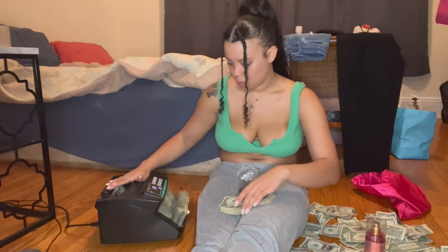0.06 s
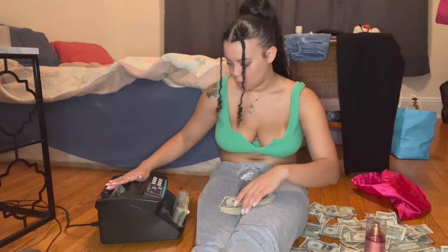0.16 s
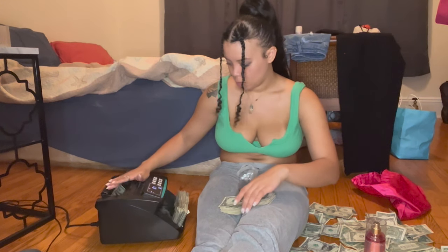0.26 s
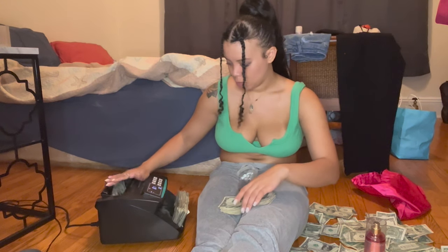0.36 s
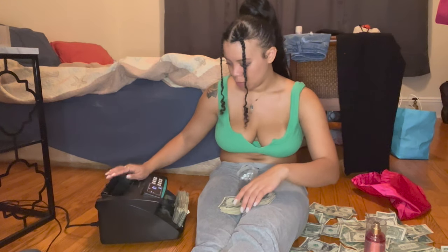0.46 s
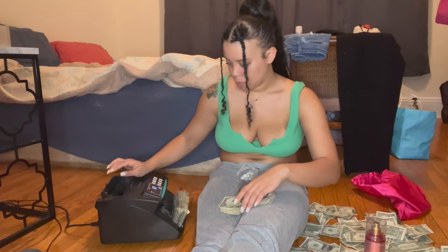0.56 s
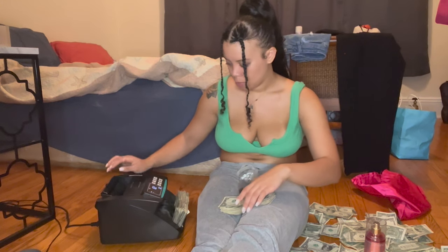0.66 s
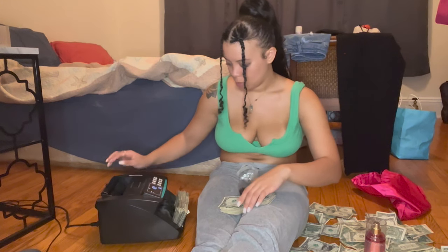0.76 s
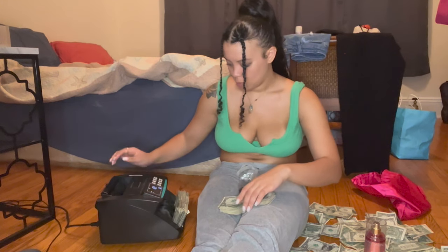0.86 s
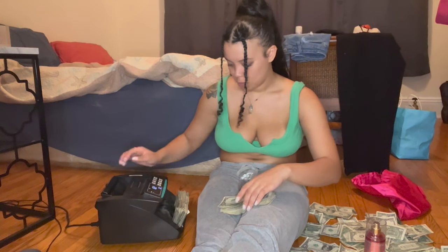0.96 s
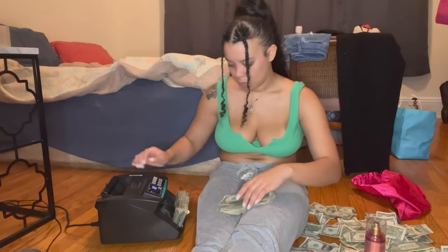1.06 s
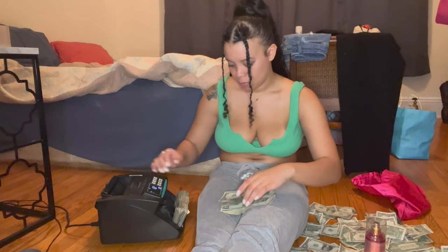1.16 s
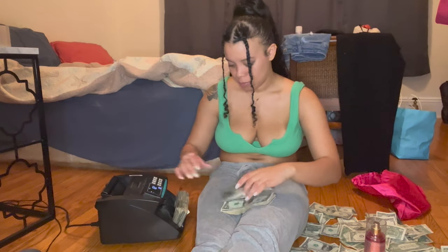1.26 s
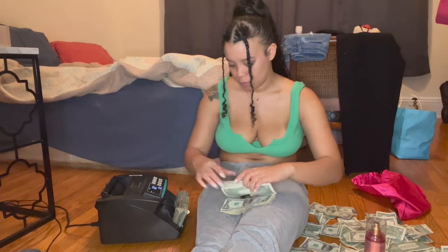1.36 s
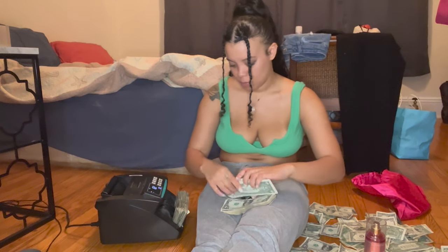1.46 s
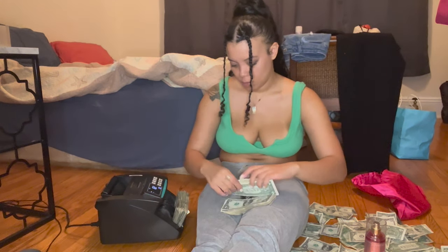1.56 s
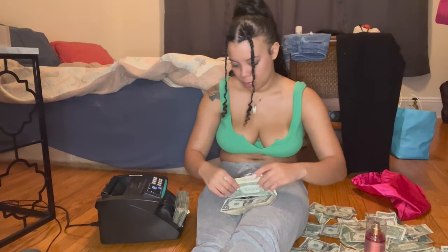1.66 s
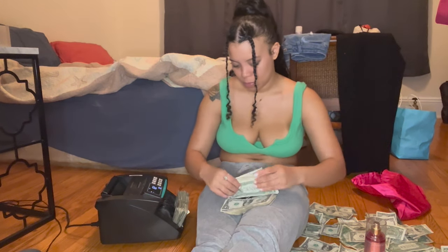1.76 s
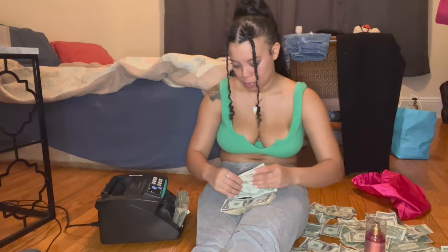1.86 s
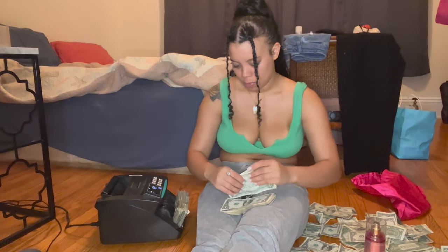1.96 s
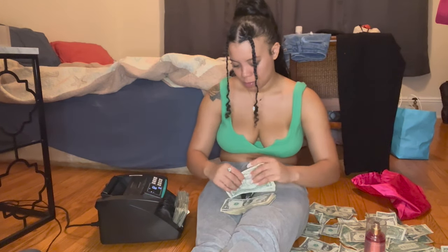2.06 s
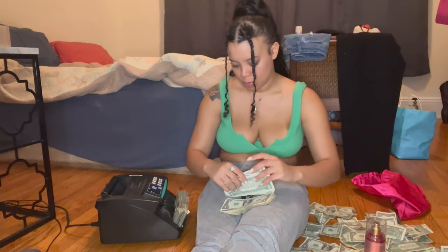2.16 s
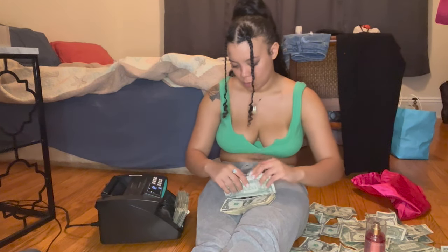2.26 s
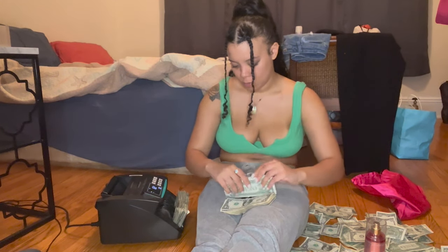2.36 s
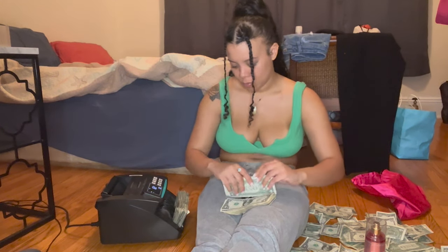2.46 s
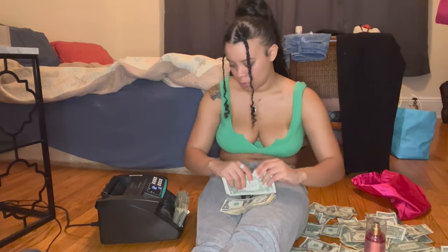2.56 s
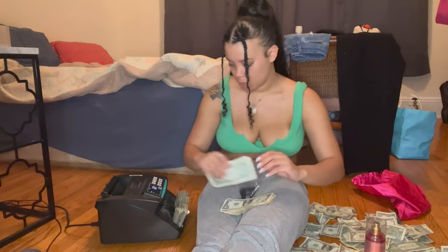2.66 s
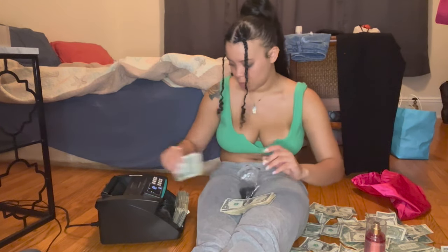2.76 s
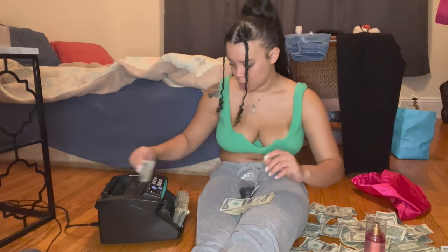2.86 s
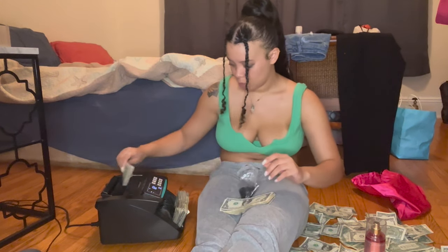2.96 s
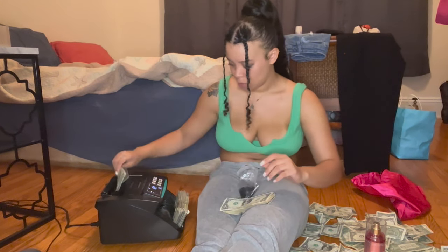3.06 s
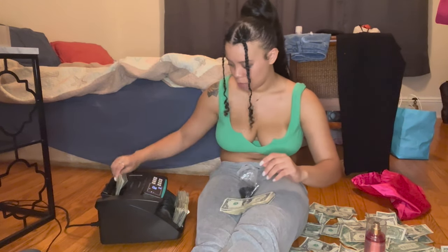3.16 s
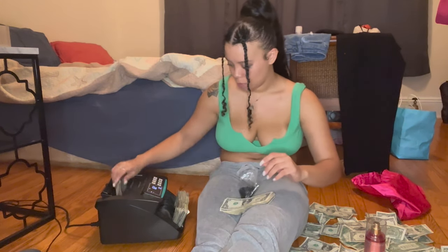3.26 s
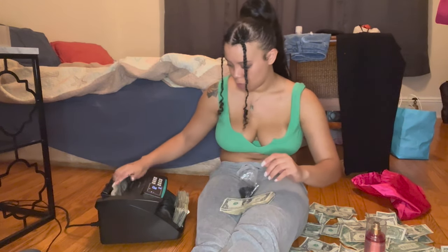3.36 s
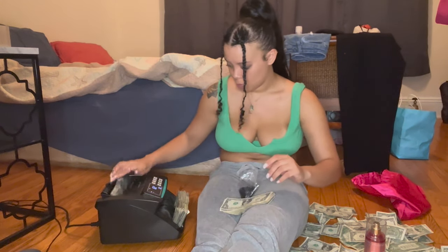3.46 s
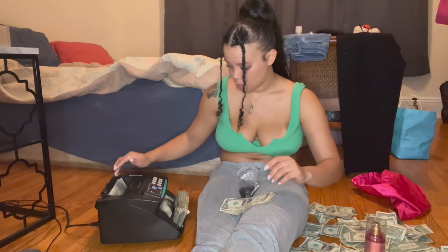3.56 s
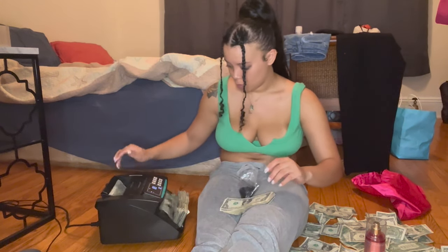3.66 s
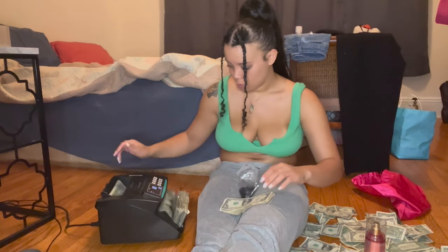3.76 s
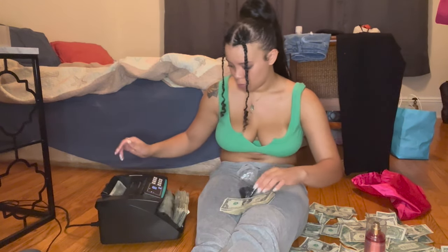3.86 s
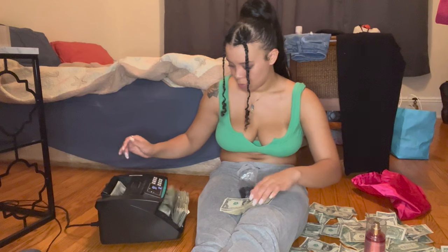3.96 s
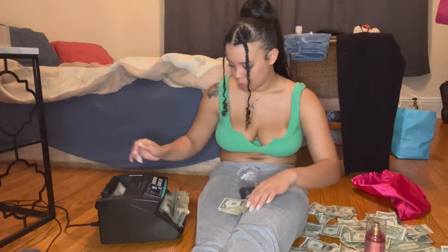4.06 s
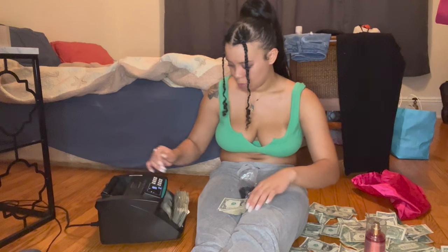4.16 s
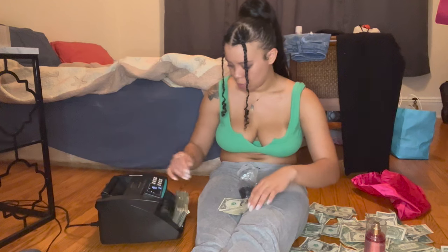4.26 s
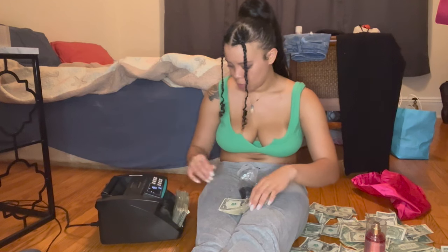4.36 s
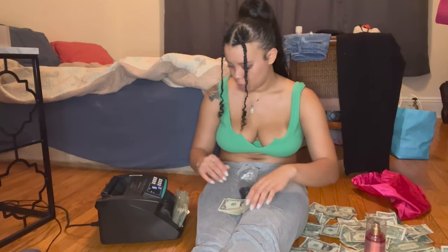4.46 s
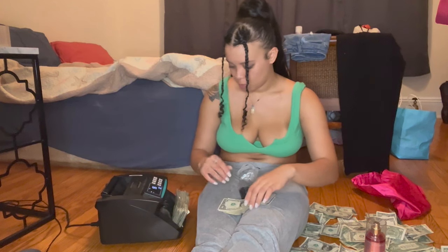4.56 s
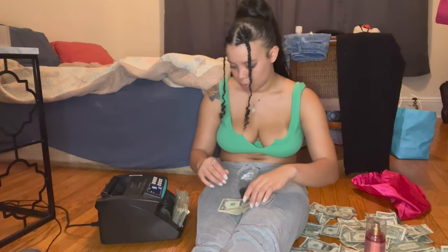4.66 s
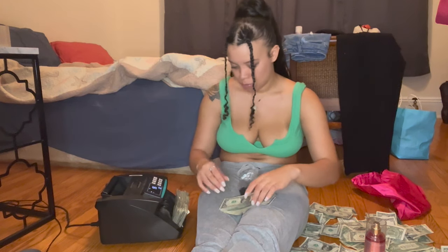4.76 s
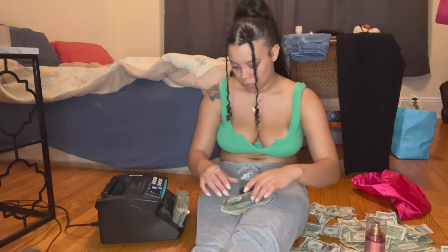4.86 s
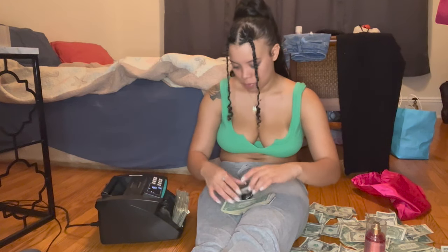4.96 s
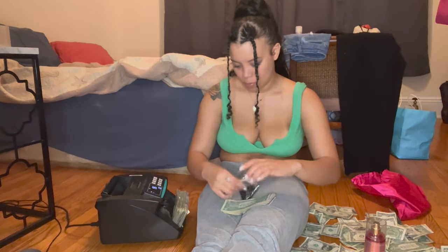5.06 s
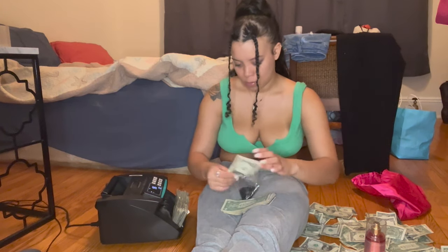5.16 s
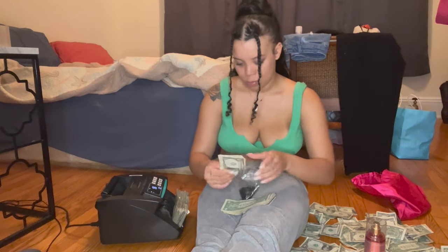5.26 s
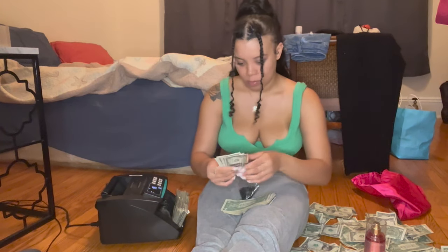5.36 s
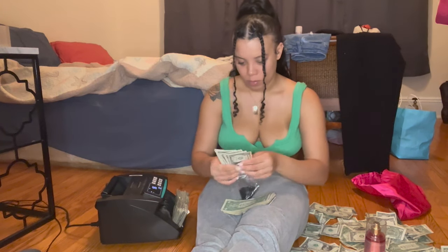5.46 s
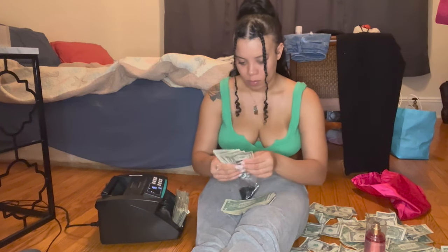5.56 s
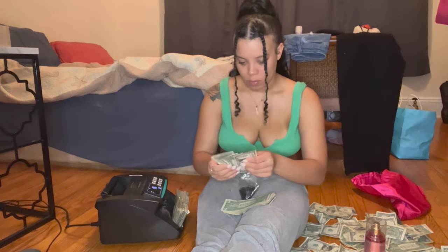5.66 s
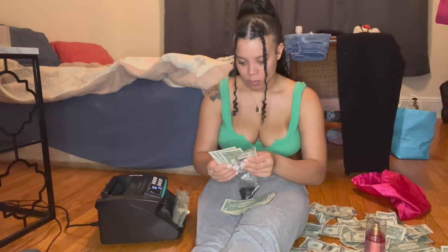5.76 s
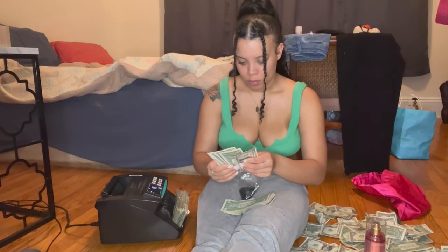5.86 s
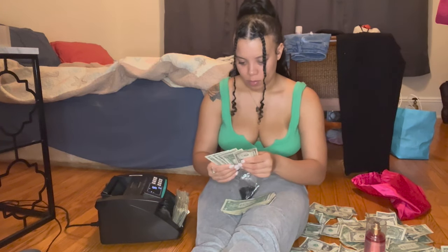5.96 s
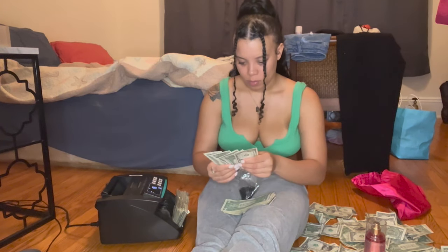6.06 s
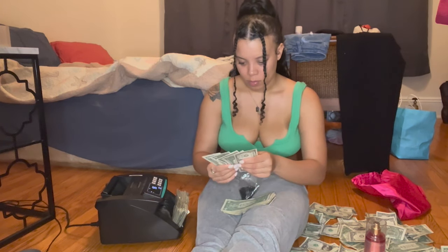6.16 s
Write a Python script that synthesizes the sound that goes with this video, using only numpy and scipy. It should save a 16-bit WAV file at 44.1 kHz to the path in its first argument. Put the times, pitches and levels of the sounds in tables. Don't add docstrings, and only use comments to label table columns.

```python
import sys
import numpy as np
from scipy import signal
from scipy.fft import rfft, irfft, next_fast_len
from scipy.io import wavfile
from scipy.ndimage import uniform_filter1d

SR = 44100
rng = np.random.default_rng(int(sys.argv[2]) if len(sys.argv) > 2 else 0)


def ratio(d):
    e = np.asarray(d, float) / 20
    return 10 ** e


def wav_record(signal):
    frames = np.transpose(np.atleast_2d(signal))
    bounded = np.clip(frames, -1, 1)
    quanta = np.round(bounded * 32767).astype(np.int16)
    wavfile.write(sys.argv[1], SR, quanta)


N = 274302
CLOCK = np.arange(0, N + 32, 32) / SR


def evened(x):
    return x / np.sqrt(np.mean(x ** 2) + 1e-20)


def noise_at_ports():
    return rng.standard_normal((2, N))


def slow_noise(samples):
    return evened(uniform_filter1d(rng.standard_normal(N), samples))


def read(points, hz):
    f, value = np.transpose(points)
    return np.interp(np.log(hz + 1), np.log(f + 1), value)


def coloured(x, points, keep_hz=np.inf):
    ripple_db, ripple_bins = 2.0, 10
    hz = abs(np.fft.fftfreq(8192, 1 / SR))
    ripple = evened(uniform_filter1d(rng.standard_normal(len(hz)), ripple_bins))
    ripple = np.interp(hz, np.arange(len(hz)) * hz[1], ripple) * (hz > 500)
    gain_db = read(points, np.minimum(hz, keep_hz)) + ripple_db * ripple
    log_gain = np.log(ratio(np.maximum(gain_db, -100)))
    taps = np.fft.ifft(np.exp(np.conj(signal.hilbert(log_gain)))).real[:4096]
    return signal.oaconvolve(x, taps[None], axes=1)[:, :N]


def resonate(x, hz, width):
    return evened(signal.lfilter(*signal.iirpeak(hz, hz / width, SR), x))


def resonate_twice(x, hz, width):
    return resonate(resonate(x, hz, width), hz, width)


def glide(x, hz, width):
    turn = np.exp(2j * np.pi * np.cumsum(hz) / SR)
    r = np.exp(-np.pi * width / SR)
    smooth = signal.lfilter([1], np.convolve([1, -r], [1, -r]), x / turn + 1e-18)
    return (turn * smooth).real


def grains(per_s, spread_db):
    size = ratio(spread_db * np.minimum(rng.exponential(1, (2, N)), 5))
    return size * rng.choice([-1., 1.], (2, N)) * (rng.random((2, N)) < per_s / SR)


def patchy(x, patchy_db, frames, bins):
    z = signal.stft(x, nperseg=256, noverlap=192)[2]
    field = uniform_filter1d(rng.standard_normal(z.shape[1:]), bins, 0)
    field = evened(uniform_filter1d(field, frames, 1))
    return signal.istft(z * ratio(patchy_db * field), nperseg=256, noverlap=192)[1][:, :N]


def shared(x, share):
    return np.array([x[0], share * np.roll(x[0], 4) + np.sqrt(1 - share ** 2) * x[1]])


def wobbly(hz, wander_hz, smooth_s):
    drift = evened(uniform_filter1d(noise_at_ports(), int(smooth_s * SR), axis=1))
    pitch = hz + wander_hz * (drift[0] + 0.22 * drift)
    return np.sqrt(2) * np.sin(2 * np.pi * np.cumsum(pitch, axis=1) / SR)


def swell(full_s, end_s, db, rise_s, fade_s):
    full_s, end_s, db, rise_s, fade_s = (np.reshape(v, (-1, 1)) for v in (full_s, end_s, db, rise_s, fade_s))
    late = np.maximum((full_s - CLOCK) / (abs(rise_s) + 1e-4), (CLOCK - end_s) / fade_s)
    return np.maximum(db - 30 * np.maximum(late, 0), -140)


def per_sample(control):
    return np.interp(np.arange(N) / SR, CLOCK, control)


def joined(*levels_db):
    return per_sample(np.sqrt(sum((ratio(db) ** 2).sum(0) for db in levels_db)))


# frequency in Hz, level in dB per Hz.
MURMUR = [(90, -10), (170, -7), (258, -7.5), (400, -16.5), (730, -24), (1000, -26.5), (3000, -35.5),
          (7100, -42), (10500, -35), (12500, -40.5), (14200, -32), (14500, -91.5)]
# frequency in Hz, level in dB per Hz.
RUMBLE_SHAPE = [(27, -58.5), (39, -9.5), (50, 3.5), (64, 4), (85, -6.5), (125, -8), (180, -53.5)]
# peak in
# seconds, level in dB.
SWELLS = [(.07, -53), (.62, -59.5), (.87, -58), (1.4, -68), (1.65, -63.5), (1.9, -64.5), (2.07, -66),
          (2.23, -65.5), (2.55, -63.5), (2.89, -63.5), (3.25, -71.5), (3.5, -58.5), (3.85, -57.5),
          (4.27, -55), (4.501, -58), (4.72, -59), (5.05, -63), (5.26, -60.5), (5.58, -62), (5.9, -65.5),
          (6.099, -66.5)]
# frequency in Hz, level in dB.
WHINE = [(10637, -104)]


def quiet_bedroom():
    murmur_db, rumble_db, rise_s, fade_s = -71.5, -71, 0.46, 0.33
    murmur = evened(coloured(noise_at_ports(), MURMUR))
    rumble = coloured(noise_at_ports(), RUMBLE_SHAPE)
    rumble = rumble[0] + 0.64 * rumble
    rumble /= np.sqrt(uniform_filter1d(rumble.mean(0) ** 2, 12000) + 1e-12)
    s, swell_db = np.transpose(SWELLS)
    traffic = np.hypot(ratio(rumble_db), joined(swell(s, s, swell_db, rise_s, fade_s)))
    whine = sum(ratio(db - 9.5) * np.sin(2 * np.pi * hz * np.arange(N) / SR) for hz, db in WHINE)
    return ratio(murmur_db) * murmur + traffic * rumble + whine


# frequency in Hz, t60 in seconds.
ROOM = [(300, 0.46), (1000, 0.25), (3000, 0.12), (9000, 0.24)]


def room(x):
    taps = rng.choice([-1., 1.], (2, SR // 3)) * (rng.random((2, SR // 3)) < .06)
    hz, t, z = signal.stft(taps, SR, nperseg=256)
    tail = signal.istft(z * ratio(-60 * t / read(ROOM, hz)[:, None]), SR, nperseg=256)[1]
    return signal.fftconvolve(x, tail / np.linalg.norm(tail[0]), axes=1)[:, :N]


# peak in seconds, rise in seconds, rustle in dB,
# hollow flex over the rustle in dB, flex pitch in Hz.
HANDS = [(1.382, 0.075, -67.5, -2.5, 1090), (1.473, 0.0025, -68.5, 4, 940), (1.559, 0.35, -73, -8, 982),
         (1.635, 0.14, -82.5, 4, 1005), (1.763, 0.0059, -65.5, -1, 1015), (1.822, 0.074, -61.5, 0.5, 1074),
         (1.898, 0.19, -66.5, 3, 1150), (1.965, 0.03, -63, 0.5, 1036), (2.102, 0.68, -76, -8, 1120),
         (2.285, 0.1, -78.5, -10.5, 1009), (2.53, 0.11, -85.5, -2, 1098), (2.608, .05, -79, 7.5, 1300),
         (2.632, 0.088, -70, -11, 1270), (2.67, 0.12, -79, -20, 1130), (3.268, 0.0017, -54.5, -4, 1697),
         (3.3, 0.055, -59, -6.5, 784), (3.37, 0.18, -72, -11.5, 805), (3.44, 0.19, -71.5, -11, 2020),
         (3.481, .004, -61, -14, 2000)]
FANNING = [(5.035, 0.0023, -66.5, 1, 1110), (5.114, 0.08, -59, 0, 1274), (5.123, 0.0082, -51.5, 4.5, 1702),
           (5.21, 0.206, -67.5, 0.5, 1670), (5.33, 0.12, -77, -19, 1190), (5.413, .003, -70, 5, 1874),
           (5.449, 0.063, -61.5, 0, 1900), (5.475, .04, -77, 12, 716), (5.51, .05, -81.5, 7.5, 695),
           (5.565, 0.07, -69.5, -8, 1930), (5.651, 0.2, -66.5, 3.5, 1900), (5.86, 0.24, -76, 4, 1080),
           (5.896, 0.067, -76.5, 7.5, 1830), (5.72, .1, -87, 6.5, 1400), (5.93, 0.18, -74, 5, 1882),
           (6, 0.0033, -69.5, 4, 1288), (6.032, 0.078, -71.5, 12, 994)]
# frequency in Hz, level in dB per Hz.
RUSTLE = [(940, -39.5), (1600, -6), (2390, 3), (2670, 0), (3030, 3), (4850, -0.5), (5900, 1), (6490, -3.5),
          (9200, -1.5), (12300, -8), (16000, -40), (22000, -120)]
# frequency in Hz, level in dB per Hz.
FLEX = [(180, -38), (300, 2.5), (412, -8.5), (541, -59.5), (610, -5.5), (709, -7), (895, 8.5), (1720, -16),
        (2370, -17.5), (2800, -12.5), (3640, -30), (6160, -120)]
# peak in seconds, level in dB.
BUMPS = [(1.508, -72), (1.658, -74), (1.822, -61.5), (1.98, -65), (2.18, -70.5), (2.4, -73), (2.644, -71),
         (3.0, -73.5), (3.296, -53.5), (3.38, -62.5), (3.53, -50), (3.6, -48.5), (.83, -66), (1.03, -70.5),
         (4.46, -59), (4.67, -68), (5.0, -63.5), (5.116, -62.5), (5.451, -60), (5.78, -66.5), (5.86, -62),
         (5.93, -66), (6.19, -70)]


def hands():
    rustle_fade_s, flex_fade_s, bump_rise_s, bump_fade_s = 0.12, 0.11, 0.065, 0.22
    s, rise_s, rustle_db, flex_db, pitch_hz = np.transpose(HANDS + FANNING)
    slides_db = swell(s, s, rustle_db, rise_s, rustle_fade_s)
    power = ratio(slides_db + flex_db[:, None]) ** 2
    flex_hz = per_sample(pitch_hz @ power / power.sum(0))

    slips = ratio(3.8 * slow_noise(300)) * grains(per_s=4000, spread_db=0.5)
    slips = patchy(slips + 1.9 * room(slips), patchy_db=2.0, frames=28, bins=6)
    rustle = ratio(5.5) * joined(slides_db) * evened(coloured(slips, RUSTLE, 11500))
    hollow = evened(glide(slips, np.maximum(flex_hz, 500), 750))
    flex = .4 * evened(coloured(slips, FLEX)) + .9 * hollow
    flexing = ratio(3.0) * joined(swell(s, s, rustle_db + flex_db, rise_s, flex_fade_s))

    bump_s, bump_db = np.transpose(BUMPS)
    landing = joined(swell(bump_s, bump_s, bump_db, bump_rise_s, bump_fade_s))
    bumps = landing * resonate_twice(noise_at_ports(), 162, 230)
    return rustle + flexing * flex + bumps


# start in seconds, peak in dB, low share in dB, ring in Hz, crack in Hz.
SNAPS = [(1.3467, -70, -6, 1000, 2900), (1.3622, -60.5, -13, 1000, 3080), (1.3748, -55.5, 2, 970, 3100),
         (1.4009, -62, 15.5, 1010, 3000), (1.4709, -53, -4, 930, 3970), (1.4827, -66, 13, 1260, 3020),
         (1.5737, -77, 19, 890, 4620), (1.7635, -56, -5, 1180, 3390), (1.7745, -50.5, -3, 1110, 3470),
         (1.7795, -55.5, -1, 1000, 3330), (1.801, -64.5, 7, 1100, 2380), (1.8135, -46, -19, 1110, 5870),
         (1.8158, -40, -3, 900, 5860), (1.8235, -53.5, -10, 1100, 4000), (1.8765, -56, 4, 1140, 2500),
         (1.9605, -54.5, -3, 1100, 2430), (1.969, -55, -6, 1100, 5830), (2.605, -76, 12, 1290, 3120),
         (3.2057, -75, 3, 1510, 2840), (3.2685, -46, -5, 2020, 3530), (3.2868, -40, -16, 824, 4670),
         (3.4788, -43.5, -12.5, 1520, 2480), (5.0335, -55, -5, 1640, 3820), (5.0885, -55, -7, 2080, 2110),
         (5.0945, -57, 7, 990, 4800), (5.1115, -49, -6, 1700, 4980), (5.1198, -31.5, -7, 1660, 5090),
         (5.1222, -34.5, -12, 2400, 4600), (5.1255, -37.5, -1, 1720, 4450), (5.856, -71, 16, 510, 1500),
         (5.4129, -63.5, -7, 1580, 5200), (5.4358, -52.5, -13, 1600, 3380),
         (5.4496, -54.5, -12, 1860, 3200), (5.5456, -62, -13, 1500, 5710), (5.5645, -60, -14, 867, 8950),
         (5.9992, -53, 8.5, 1610, 2900), (6.0035, -54, 0.5, 2440, 4230), (6.0262, -55.5, 9, 1026, 2650)]


def snaps():
    ports, t = np.zeros((2, N)), np.arange(1200) / SR

    def pop(width_s):
        return np.e * t / width_s * np.exp(-t / width_s)

    fizz = rng.standard_normal((len(SNAPS), 2, len(t)))
    for (s, db, low_db, ring_hz, crack_hz), tear in zip(SNAPS, fizz):
        crack = 0.45 * (tear[0] + .6 * tear) * pop(0.00047)
        crack = crack + 0.36 * np.sin(2 * np.pi * crack_hz * t) * pop(0.001)
        ring = ratio(low_db) * np.sin(2 * np.pi * ring_hz * t) * pop(0.00065)
        ports[:, round(s * SR):][:, :len(t)] += ratio(db) * (crack + ring)
    ports = signal.lfilter(*signal.butter(1, [500, 12000], "band", fs=SR), ports)
    return ports + ratio(-9.0) * room(ports)


# frequency in Hz, level in dB, t60 in seconds.
HOPPER = [(786, -62.5, 0.39), (1900, -56.5, 0.091), (2360, -57, 0.055), (3340, -50.5, 0.045)]


def hopper():
    landing_s = 3.2675
    t = np.maximum(np.arange(N) / SR - landing_s, 0)
    return sum(ratio(db - np.minimum(60 * t / t60, 200)) * np.sin(2 * np.pi * hz * t) for hz, db, t60 in HOPPER)


SPIN_UP_S, GEARS_STOP_LEAD_S, COAST_S = 0.024, 0.13, 0.3
# at full speed in seconds, switched off in seconds.
RUNS = [
    (-.2, 0.7),
    (3.56, 4.353),
]
# full in seconds, end in seconds, whirr in dB,
# rise in seconds, speed from 0 to 1, whine in dB.
CREEP = (3.36, 3.5, -75, .1, 1.0, -63.5)
# frequency in Hz, level in dB per Hz.
WHIRR = [(120, -21.5), (200, 12), (480, -8.5), (800, -9), (1150, -5), (1500, -8), (2700, -14),
         (3400, -12.5), (4500, -14.5), (7000, -20.5), (9200, -10), (11000, -19), (13300, -9), (15500, -13)]
# frequency in Hz, width in Hz, level in dB.
BELT = [(785, 190, -6.5), (2100, 800, -7), (1570, 350, -16.5), (2480, 400, -15.5), (2030, 300, -14)]


def idle():
    idle_db, whine_db, coast_lag_s, coast_fade_s = -59.5, -66, 0.11, 0.29
    slowing = 0.45
    on, off = np.transpose(RUNS)
    full_s, end_s, creep_db, rise_s, creep_speed, creep_whine_db = CREEP
    whirring = joined(swell(on, off + coast_lag_s, idle_db, SPIN_UP_S, coast_fade_s),
                      swell(full_s, end_s, creep_db, rise_s, SPIN_UP_S))
    whining = joined(swell(on, off, whine_db, SPIN_UP_S, coast_fade_s),
                     swell(off + 0.085, off + coast_lag_s, -63, 0.15, 0.16),
                     swell(full_s, end_s, creep_whine_db, rise_s, SPIN_UP_S))
    coasting_s = np.where(CLOCK < on[1], CLOCK - off[0], CLOCK - off[1]).clip(0)
    creeping = (CLOCK > full_s - rise_s) & (CLOCK < on[1])
    speed = per_sample(np.where(creeping, creep_speed, .98 - slowing * coasting_s)).clip(.5, 1.2)
    teeth = grains(per_s=12000, spread_db=5.5)
    whine = sum(ratio(db) * evened(glide(np.sign(teeth), hz * speed, w)) for hz, w, db in BELT)
    whirr = patchy(evened(coloured(teeth, WHIRR)), patchy_db=3.0, frames=32, bins=3)
    return whirring * whirr + whining * evened(whine)


def rings(hits, gain_db, rise_s, t60, damping):
    out, t = np.zeros((2, N)), np.arange(6000) / SR
    for (s, db, hz), (detune, turn, twin) in zip(hits, rng.uniform(-1, 1, (len(hits), 3))):
        part = out[:, round(s * SR):][:, :len(t)]
        turns = hz * t + np.array([[-.1], [.1]]) * turn
        twin_turns = turns * (1 + 0.17 * detune) + twin
        pair = np.sin(2 * np.pi * turns) + 0.51 * np.sin(2 * np.pi * twin_turns)
        fall_db = 60 * t / t60 * (hz / 800) ** damping
        part += ratio(db + gain_db - fall_db) * (1 - np.exp(-t / rise_s)) * pair
    return out


# start in seconds, peak in dB, ring in Hz.
THUMPS = [(0.024, -30.5, 346), (0.504, -31, 368), (3.584, -24, 337), (3.644, -32, 378), (3.715, -27.5, 330),
          (3.775, -22, 399), (3.809, -37.5, 448), (3.861, -25, 410), (3.955, -24, 376), (4.039, -27, 347),
          (4.082, -33.5, 333)]
# start in seconds, peak in dB, ring in Hz.
KNOCKS = [(.023, -31, 773), (.054, -35.5, 842), (.064, -36, 1330), (.4185, -38.5, 4300), (.433, -46, 2150),
          (.452, -45.5, 1620), (.464, -30.5, 1480), (.471, -32.5, 1300), (.481, -53.5, 560),
          (.494, -32.5, 1900), (.505, -27, 797), (.522, -38, 900), (3.49, -52.5, 2090), (3.511, -44, 990),
          (3.542, -35.5, 820), (3.555, -29.5, 1135), (3.582, -38.5, 640), (3.598, -26, 1370),
          (3.629, -28, 935), (3.632, -29.5, 1420), (3.6, -36.5, 806), (3.654, -34.5, 830),
          (3.681, -39, 855), (3.7, -36, 805), (3.731, -29, 907), (3.72, -35, 900), (3.744, -34, 670),
          (3.773, -32, 634), (3.785, -32.5, 890), (3.827, -28, 711), (3.806, -27, 917), (3.81, -27, 2000),
          (3.85, -32, 744), (3.851, -34, 1460), (3.899, -34.5, 750), (3.922, -41.5, 980), (3.957, -34, 729),
          (3.966, -36, 2100), (3.985, -37.5, 610), (4.006, -36, 985), (4.041, -38.5, 850),
          (4.057, -33.5, 930), (4.031, -30, 810), (4.074, -34.5, 980), (4.095, -26, 1530),
          (4.148, -31, 963), (4.13, -29.5, 1290), (4.165, -38.5, 990), (4.22, -49, 1090)]


def thumps():
    boards = rings(THUMPS, gain_db=-2.5, rise_s=.003, t60=0.12, damping=0)
    panels = rings(KNOCKS, gain_db=2.7, rise_s=.0012, t60=.034, damping=.5)
    return boards + panels


# start in seconds, end in seconds, level in dB, rattle over it in dB.
FEED = [
    (-.1, 0.069, -47, 6.5),
    (0.437, 0.502, -45, 1),
    (3.505, 4.146, -42.5, 1.5),
]
# frequency in Hz, width in Hz, level in dB.
BOOM = [(338.5, 66, 3.5), (377, 4.1, -7.5), (421.3, 26, -4), (193, 62, -2.5)]
# full in seconds, end in seconds, level in dB.
SURGES = [(0.01, 0.05, -39), (0.082, 0.148, -38.5), (0.23, 0.325, -41), (0.36, 0.402, -41),
          (0.405, 0.448, -39), (0.467, 0.557, -42.5), (0.597, 0.663, -39), (0.716, 0.755, -41.5),
          (0.78, 0.8, -58), (0.827, 0.885, -67.5), (3.52, 3.534, -43), (3.542, 3.582, -39.5),
          (3.595, 3.627, -33), (3.682, 3.71, -46), (3.764, 3.777, -38), (3.816, 3.84, -38),
          (3.895, 3.915, -32.5), (3.94, 3.955, -34.5), (4.004, 4.078, -38.5), (4.09, 4.188, -39.5),
          (4.236, 4.257, -41), (4.31, 4.349, -42.5), (4.401, 4.413, -42.5), (4.49, 4.53, -76)]


def motor():
    hum_db, hum_fade_s, throb_db, throb_fade_s = -47.5, 0.089, -49.5, 0.026
    on, off = np.transpose(RUNS)
    start, end, feed_db, rattle_db = np.transpose(FEED)
    hum = joined(swell(on, off, hum_db, SPIN_UP_S, hum_fade_s)) * wobbly(119.8, 0.81, 0.07)
    brake_s = off - 0.061
    throbbing = joined(swell(on, off, throb_db, SPIN_UP_S, throb_fade_s),
                       swell(brake_s, brake_s + .04, -38.5, 0.05, throb_fade_s))
    throb = throbbing * wobbly(95.5, 2.2, 0.058)

    load = joined(swell(on, off - GEARS_STOP_LEAD_S, -49.5, SPIN_UP_S, COAST_S),
                  swell(start + 0.01, end, feed_db + rattle_db - 2, .04, 1))
    load = load * joined(swell(on - .2, off, 0, SPIN_UP_S, 0.17))
    chatter = ratio(2.0 * slow_noise(900)) * noise_at_ports()
    boom = sum(ratio(db) * resonate_twice(chatter, hz, w) for hz, w, db in BOOM)
    gears = evened(boom) + ratio(-7) * wobbly(363.2, 5, 0.036)

    drone_hz = 268
    drone = .9 * wobbly(drone_hz, 5, .025) + .3 * resonate_twice(chatter, drone_hz, 34)
    surging = joined(swell(*np.transpose(SURGES), 0.048, 0.05))
    return ratio(-2.0) * hum + ratio(-3.0) * throb + ratio(1.0) * surging * drone + ratio(2.5) * load * gears


# frequency in Hz, level in dB per Hz.
HISS = [(880, -39.5), (1500, -5.5), (1840, -12), (2010, -4.5), (2520, -10.5), (3400, -5), (4590, -6.5),
        (4920, -4), (7650, -9), (9040, -8.5), (12300, -15.5), (16000, -44.5), (22000, -120)]
# frequency in Hz, level in dB per Hz.
RATTLE = [(76, -26.5), (130, -8), (155, -28.5), (220, -13.5), (269, -6), (301, -23.5), (368, -3), (428, -5),
          (479, -13.5), (907, -11.5), (1180, -16.5), (1500, -17.5), (2600, -24.5), (3380, -42),
          (5720, -120)]
# frequency in Hz, width in Hz, level in dB.
CASE = [(516.4, 8.5, 2), (602, 17, -1.5), (707, 35, -2.5), (736, 53, 3.5), (812.4, 25, 9), (900, 18, 1),
        (965, 14, 3), (1038, 40, 1.5), (1169, 10, 4), (1295, 35, -1.5), (1546, 14, 3), (2090, 40, 5)]
# start in seconds, peak in dB, colour in Hz.
SLAPS = [(.024, -30.5, 5500), (.059, -36.5, 3600), (0.4197, -35.5, 4410), (.438, -41.5, 3590),
         (.449, -38, 5464), (.468, -40.5, 3200), (.48, -33.5, 3340), (.491, -32, 2490), (.5, -34.5, 4840),
         (.52, -41, 3000), (3.507, -37, 4260), (3.538, -35.5, 5735), (3.581, -29.5, 2920),
         (3.604, -26, 4200), (3.645, -26, 5870), (3.664, -36.5, 4836), (3.69, -34.5, 3460),
         (3.702, -33, 4780), (3.743, -36, 4370), (3.784, -30.5, 5710), (3.804, -34, 3350),
         (3.823, -36, 5550), (3.874, -32, 4836), (3.923, -26.5, 5070), (3.945, -27.5, 3450),
         (3.967, -27.5, 3700), (4.006, -24.5, 4990), (4.049, -36.5, 3730), (4.068, -40.5, 3915),
         (4.094, -29, 3590), (4.116, -33, 6480), (4.137, -34.5, 3206), (4.174, -44.5, 3800)]


def feed():
    notes_per_s, feed_rise_s = 19, 0.034
    on, off = np.transpose(RUNS)
    start, end, feed_db, rattle_db = np.transpose(FEED)
    passing = joined(swell(start, end, feed_db, feed_rise_s, .1),
                     swell(start, end, feed_db - 12.5, feed_rise_s, 0.27))
    shaking = joined(swell(start + .05, end, feed_db + rattle_db, 0.078, 0.13),
                     swell(on, off - GEARS_STOP_LEAD_S, -59.5, SPIN_UP_S, COAST_S))

    turn = 2 * np.pi * np.arange(N) * notes_per_s / SR
    flutter_db = 1.6 * np.cos(turn) + 0.27 * np.cos(2 * turn)
    scrape = patchy(grains(per_s=5000, spread_db=1.0), patchy_db=0.5, frames=9, bins=3)
    hiss = passing * ratio(6.0 + flutter_db) * evened(coloured(shared(scrape, share=0.36), HISS, 13000))

    knocks = patchy(grains(per_s=1500, spread_db=-0.5), patchy_db=2.5, frames=18, bins=1)
    judder = ratio(.9 * evened(uniform_filter1d(knocks[1], size=260)))
    knocks = shared(knocks, share=0.48)
    panels = sum(ratio(db) * resonate(knocks, hz, w) for hz, w, db in CASE)
    rattle = evened(evened(coloured(knocks, RATTLE)) + 0.57 * evened(panels))
    rattle = ratio(6.83) * shaking * judder * rattle

    slapping, colour_hz, t = np.zeros(N), np.ones(N), np.arange(900) / SR
    for s, db, hz in SLAPS:
        colour_hz[round(s * SR):] = hz
        part = slapping[round(s * SR):][:len(t)]
        part += ratio(db) * (1 - np.exp(-t / 0.0024)) * np.exp(-t / 0.0049)
    noise = shared(noise_at_ports(), share=0.36)
    slap = .6 * evened(coloured(noise, HISS, 13000))
    slap += 0.53 * evened(glide(noise, colour_hz, width=2000))
    slap += 0.55 * evened(coloured(noise, RATTLE))
    return hiss + rattle + ratio(2.5) * slapping * slap


def scene():
    return quiet_bedroom() + hands() + snaps() + hopper() + idle() + thumps() + motor() + feed()


def roll_off(x):
    return signal.sosfilt(signal.butter(12, 15800, fs=SR, output="sos"), x)


# frequency in Hz, gain in dB.
CENTRE = [(12500, 0), (12850, -12.5), (13500, -15), (13900, -49)]
# frequency in Hz, gain in dB.
WIDTH = [(60, -13.5), (110, -12), (150, -3), (220, -4), (500, 3), (1500, 0), (3500, -0.5), (6000, -1.5),
         (8100, -1.5), (8500, -47.5), (11200, -43.5), (11700, 4), (15500, 5.5)]
# frequency in Hz, level difference in dB.
LEFT_OVER_RIGHT = [(60, -1.5), (200, -3.5), (350, -2.5), (640, 1), (1150, -1), (2070, -.5), (3740, -1),
                   (6760, -4.5), (9000, 0.8)]


def record(dry):
    leak = 0.21
    left = (dry[0] + leak * np.roll(dry[1], 3)) / np.hypot(1, leak)
    right = dry[1]
    size = next_fast_len(N + SR // 4)
    hz = np.fft.rfftfreq(size, 1 / SR)
    mid = irfft(rfft(left + right, size) * ratio(read(CENTRE, hz)), size)[:N] / 2
    side = irfft(rfft(left - right, size) * ratio(read(WIDTH, hz)), size)[:N] / 2
    tilt = ratio(np.outer([.5, -.5], read(LEFT_OVER_RIGHT, hz)))
    ports = irfft(rfft([mid + side, mid - side], size) * tilt, size)[:, :N]
    return roll_off(ports)


dry = scene()
out = record(dry)
wav_record(out)
```